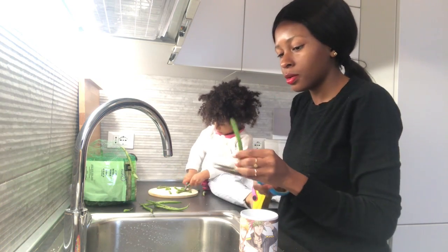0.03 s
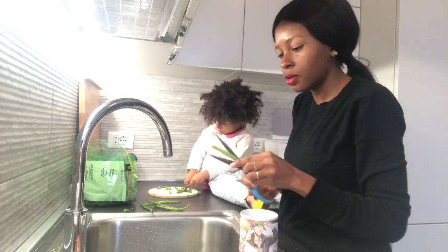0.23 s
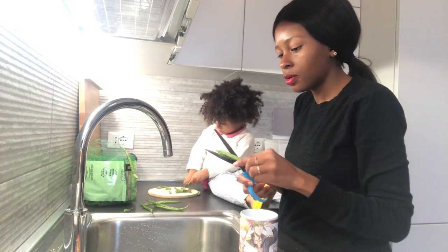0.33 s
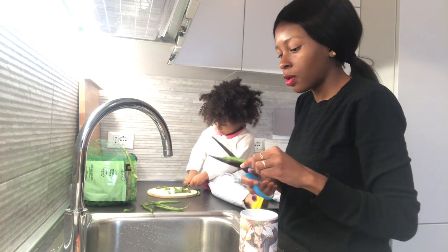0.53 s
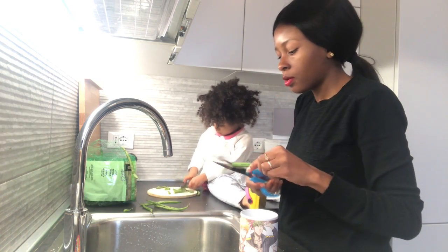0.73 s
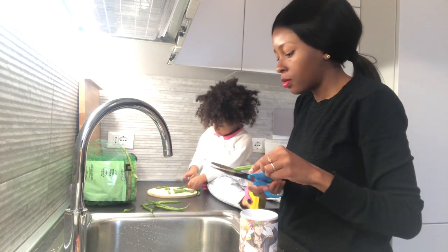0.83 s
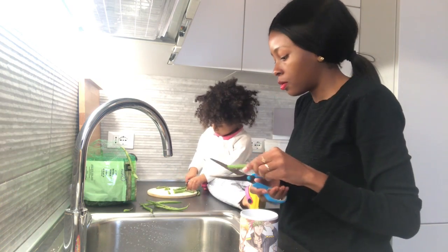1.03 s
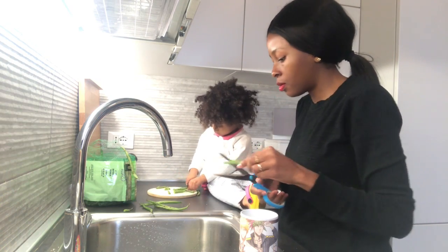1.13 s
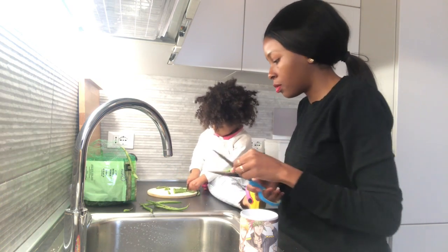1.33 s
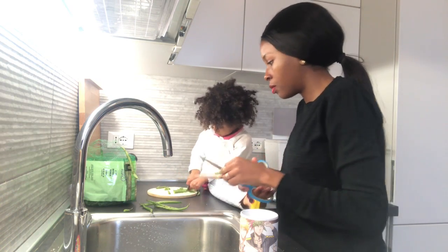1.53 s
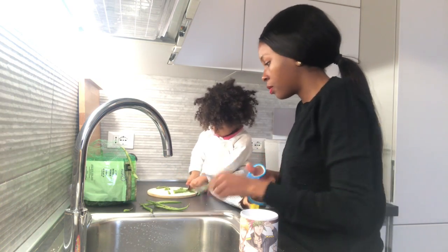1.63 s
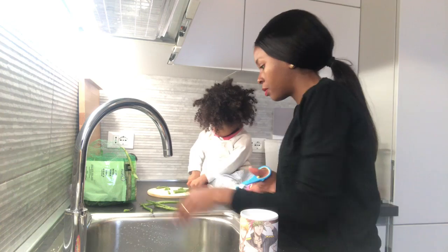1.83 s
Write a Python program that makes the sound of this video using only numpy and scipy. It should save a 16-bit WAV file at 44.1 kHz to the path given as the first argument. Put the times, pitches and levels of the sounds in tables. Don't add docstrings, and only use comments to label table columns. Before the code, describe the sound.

A blade chops through a bean onto a wooden board, which knocks, then scissors snap softly

```python
import sys
import numpy as np
from scipy import signal
from scipy.fft import rfft, irfft, next_fast_len
from scipy.io import wavfile
from scipy.ndimage import uniform_filter1d, map_coordinates

SR = 44100
rng = np.random.default_rng(int(sys.argv[2]) if len(sys.argv) > 2 else 0)


def field_ratio(decibels):
    return 10 ** (np.asarray(decibels, dtype=float) / 20)


def dump_mix(stems):
    frames = np.atleast_2d(stems).T
    limited = np.clip(frames, -1, 1)
    pcm = np.round(limited * 32767).astype(np.int16)
    wavfile.write(sys.argv[1], SR, pcm)


N = 83790


def unit(x):
    return x / np.sqrt(np.mean(x ** 2) + 1e-20)


def along(points, hz):
    point_hz, value = np.transpose(points)
    return np.interp(np.log(hz + 1), np.log(point_hz + 1), value)


def filtered(x, response):
    size = next_fast_len(len(x) + 8192)
    spectrum = rfft(x, size) * response(np.fft.rfftfreq(size, 1 / SR))
    return irfft(spectrum, size)[:len(x)]


def peak(hz, width_hz):
    return lambda f: 1j * f * width_hz / (hz * hz - f * f + 1j * f * width_hz + 1e-9)


def wobble(rate_hz, size):
    points = rng.standard_normal(int(size * rate_hz / SR) + 4)
    return map_coordinates(points, [np.arange(size) * rate_hz / SR])


def scrub(length_s):
    fade = np.exp(-np.arange(2048) / SR / length_s)
    x = fade * rng.standard_normal(2048)
    for _ in range(6):
        spectrum = rfft(x)
        x = irfft(spectrum / np.abs(spectrum))
        power = np.abs(uniform_filter1d(x * x, size=64, mode="wrap"))
        x = x * fade / np.sqrt(power + 1e-12)
    return x


MOST_CYCLES, STEEL_CYCLES = 48, 140
SPREAD_DB, WAVER = 1.5, 0.003
CRACK_DB = 14
LOW_CUT_HZ = 234


def strike(hits, modes, count=MOST_CYCLES):
    out = np.zeros(N + SR)
    t = np.arange(SR // 4) / SR
    hz, level_db, t60_s = np.transpose(modes)[:, :, None]
    t60_s = np.minimum(t60_s, count / hz)
    signs = (-1.) ** np.arange(len(modes))
    for start_s, level, bright_hz, scrub_s in hits:
        level_chance, pitch_chance = rng.standard_normal((2, len(modes), 1))
        fade = field_ratio(level_db + SPREAD_DB * level_chance - 60 * t / t60_s)
        tones = np.sin(2 * np.pi * hz * (1 + WAVER * pitch_chance) * t)
        ring = signs @ (fade * tones)
        ring[0] += field_ratio(CRACK_DB)
        x = signal.fftconvolve(scrub(scrub_s), ring)[:len(t)]
        x = filtered(x, lambda f: (1j * f / (LOW_CUT_HZ + 1j * f) / (1 + 1j * f / bright_hz)) ** 2)
        out[round(start_s * SR):][:len(t)] += field_ratio(level) * x / np.abs(x).max()
    return out[:N]


# start_s, peak level_db, brightness_hz, scrub_s
CHOPS = [
    (.1825, -44, 900, 0.0038),
    (.1908, -14, 5800, 0.003),
    (.1942, -16.5, 6500, 0.0021),
]
# pitch_hz, level_db, t60_s (time to fade by 60 dB)
BOARD = [(335.8, 0.5, 0.14), (377.6, 0.5, 0.04), (540, -7.5, 0.019), (630, 0, .08), (868, -5.5, .055),
         (931, -0.5, 0.029), (1120, -13, 0.038), (1302, -13, .04), (1623, -6.5, .04), (1943, -3, .015),
         (2400, 0, 0.0046), (3160, -3, 0.021), (3910, -4.5, .012), (4290, -4, 0.014)]


def chopping():
    return strike(CHOPS, BOARD)


# start_s, peak level_db, brightness_hz, scrub_s
ROCKS = [
    (.370, -21, 2210, 0.0042),
    (.377, -22.5, 2210, 0.0037),
    (.567, -49.5, 1500, 0.0017),
    (.7395, -48.5, 1220, 0.000967),
    (.759, -53.5, 1530, 0.013),
]
# pitch_hz, level_db, t60_s
PRESSED = [(359, 0, 0.038), (494, -5, 0.017), (631, -6, 0.047), (872, -1.5, 0.041), (1010, -3.5, 0.055),
           (1225, -2.5, 0.029), (1316, 0.5, .06), (1626, -4, 0.048), (2130, -14, 0.024),
           (2926, -10.5, 0.024), (4030, -8, 0.01)]
# start_s, peak level_db, brightness_hz, scrub_s
SETTLES = [
    (.447, -36.5, 5000, 0.0078),
    (.4545, -40, 1800, 0.0023),
    (.4585, -32, 1800, 0.0024),
    (.502, -43, 1500, .001),
]
# pitch_hz, level_db, t60_s
EDGE = [(300, -10, .03), (880, -5, .05), (965, 0, .05), (1250, -2, .038), (2000, -14, .02),
        (3200, -14, .015), (4000, -14, .012)]
# start_s, peak level_db, brightness_hz, scrub_s
NUDGES = [
    (1.286, -53, 1540, 0.0032),
    (1.315, -58, 507, 0.0012),
    (1.4035, -46.5, 690, 0.00063),
    (1.423, -48.5, 920, 0.0012),
    (1.4385, -42.5, 1530, 0.00094),
    (1.5, -57.5, 1200, 0.0084),
    (1.539, -53, 492, 0.00097),
    (1.586, -52.5, 590, 0.00086),
    (1.8235, -51.5, 795, .001),
]
# pitch_hz, level_db, t60_s
HELD = [(326, -2.5, 0.039), (396, -3, 0.027), (545, -8.5, 0.018), (648, -12, 0.072), (955, -13.5, 0.066),
        (1290, -7, 0.016), (1640, -13.5, 0.031)]


def board_moving():
    return strike(ROCKS, PRESSED) + strike(SETTLES, EDGE) + strike(NUDGES, HELD)


# start_s, peak level_db, brightness_hz, scrub_s
TIP_SNAP = [
    (.5268, -36.5, 9300, 0.0028),
    (.5298, -34, 6240, 0.0039),
    (.545, -39, 3000, 0.0057),
]
# pitch_hz, level_db, t60_s
TIPS = [(1000, -12, .026), (1600, -8, .025), (1800, -6, .03), (2200, -11, .02), (2700, -9, .03),
        (3330, -6, .035), (3850, 1, .022), (4600, -5, .02), (5800, -4, .014), (7460, -9, .0063)]
# start_s, peak level_db, brightness_hz, scrub_s
SHUT_SNAP = [
    (.9955, -49, 9000, 0.0052),
    (.998, -38.5, 9100, 0.0018),
    (1.0005, -41, 7170, 0.0026),
]
# pitch_hz, level_db, t60_s
HANDLES = [(1034, -22, .03), (1225, -4, .11), (1330, -9, .03), (1850, -11, .02), (3310, 1, .035),
           (3700, -4, .015), (4400, -6, .012), (5800, -7, .01), (7500, -9, .008)]
# start_s, peak level_db, brightness_hz, scrub_s
PINCH = [
    (.8065, -41, 5040, 0.003),
]
# pitch_hz, level_db, t60_s
PIVOT = [(1803, 2.5, 0.02), (2120, 2, .02), (4200, -5, 0.01), (5850, -2, 0.0083)]


def scissors():
    snaps = strike(TIP_SNAP, TIPS, count=STEEL_CYCLES) + strike(SHUT_SNAP, HANDLES, count=STEEL_CYCLES)
    return snaps + strike(PINCH, PIVOT)


# start_s, rise_s, fall t60_s, level_db, colour_hz
CRUNCH = [(.001, 0.0033, 0.18, -61, 5600), (0.19, .0005, 0.021, -78, 13500),
          (0.193, 0.00027, 0.05, -33, 2870), (.303, .002, 0.13, -56.5, 7000),
          (0.327, 0.0036, 0.072, -57, 11000), (0.352, .01, 0.29, -59, 9000),
          (0.375, 0.0098, 0.039, -46, 10800), (0.391, 0.036, 0.092, -52, 7660),
          (0.45, 0.006, 0.056, -49.5, 3000), (0.456, 0.0023, 0.031, -74, 11200),
          (0.527, 0.0003, 0.13, -47, 2970), (0.7679, 0.00011, 0.012, -41, 8100),
          (0.771, 0.0017, 0.052, -51.5, 6000), (0.81, 0.015, 0.087, -43.5, 8600),
          (.825, 0.013, 0.017, -59, 1000), (1.03, 0.0073, 0.49, -72, 1240),
          (1.721, 0.058, 0.8, -70.5, 6000), (.998, 0.0015, 0.029, -46.5, 6030),
          (1.021, 0.0035, 0.071, -59, 10100), (1.184, 0.0039, 0.055, -60, 7300),
          (1.3, 0.0069, 0.92, -76, 2180), (1.425, 0.054, 0.14, -61, 7040),
          (1.443, 0.012, 0.061, -50.5, 8040), (1.5, 0.0098, 0.16, -87, 4940)]
CRUNCH_WIDTH = 1.6
GRIT_DB = 2.2


def crunch(bursts):
    lead, size = SR // 10, SR // 2
    out = np.zeros(N + size)
    t = (np.arange(size) - lead) / SR
    for start_s, rise_s, fall_s, level_db, colour_hz in bursts:
        colour = peak(colour_hz, CRUNCH_WIDTH * colour_hz)
        rough = rng.standard_normal(size) * field_ratio(GRIT_DB * wobble(990, size))
        grit = unit(filtered(rough, lambda f: colour(f) ** 2))
        rise = np.exp(np.minimum(t, 0) / rise_s)
        shape = np.where(t < 0, rise, field_ratio(-60 * np.abs(t) / fall_s))
        out[round(start_s * SR):][:size] += field_ratio(level_db) * grit * shape
    return out[lead:N + lead]


# middle_s, half_length_s, level_db, pitch_hz
SLIDES = [
    (0.776, 0.014, -56, 3200),
    (1.063, 0.023, -71, 3300),
    (1.1, 0.095, -66, 1380),
    (1.195, 0.019, -68.5, 4040),
    (1.296, 0.016, -69, 2080),
    (1.406, 0.046, -70, 2240),
    (1.452, 0.025, -63.5, 864),
]
SLIDE_WIDTH = 0.12


def slides():
    t = np.arange(N) / SR
    out = np.zeros(N)
    for middle_s, half_s, level_db, hz in SLIDES:
        swell = np.exp(-((t - middle_s) / half_s) ** 2)
        noise = filtered(rng.standard_normal(N), peak(hz, SLIDE_WIDTH * hz))
        out += field_ratio(level_db) * swell * unit(noise)
    return out


# start_s, peak level_db, pitch_hz, t60_s
THUDS = [
    (.196, -43, 143.6, 0.26),
    (0.373, -39, 79, 0.051),
    (0.384, -53, 161, 0.49),
    (0.69, -57, 176, 0.24),
    (1.009, -40.5, 196, 0.1),
    (1.042, -47, 202, .1),
    (1.078, -47.5, 191, 0.1),
    (1.303, -59, 136.4, 0.37),
    (1.412, -58, 142.3, 0.49),
]
THUD_RISE_S, BOOM_FLUTTER_DB = 0.0063, 2.2
# start_s, level_db, pitch_hz, t60_s
RING_TICK = (1.596, -56, 13800, .04)


def counter():
    t = np.arange(N) / SR
    start_s, level_db, hz, t60_s = np.transpose(THUDS)[:, :, None]
    since = np.maximum(t - start_s, 0)
    shape = field_ratio(level_db - 60 * since / t60_s) * (1 - np.exp(-since / THUD_RISE_S))
    booms = shape * np.sin(2 * np.pi * hz * since)
    booms = (booms * field_ratio(BOOM_FLUTTER_DB * wobble(44.78, N))).sum(0)

    tick_s, tick_db, tick_hz, tick_t60_s = RING_TICK
    tick = unit(filtered(rng.standard_normal(N), lambda f: peak(tick_hz, 2500)(f) ** 2))
    fade = (t > tick_s) * field_ratio(-60 * np.abs(t - tick_s) / tick_t60_s)
    return booms + field_ratio(tick_db) * tick * fade


# start_s, rise_s, fall t60_s, level_db, colour_hz
WASH = [
    (.197, 0.0014, 0.37, -42, 2100),
    (.2, 0.0026, 0.39, -40.5, 520),
    (.378, 0.0061, 0.18, -46.5, 2400),
    (.465, 0.0049, 0.23, -51.5, 1480),
    (.5272, 0.00026, 0.017, -40, 4500),
    (.57, 0.024, 0.17, -57.5, 260),
    (.3, 0.024, 0.35, -54, 230),
    (1.04, 0.036, 0.39, -62.5, 340),
]


def wash():
    return crunch(WASH)


# pitch_hz, t60_s
KITCHEN = [(150, .6), (1000, .5), (4000, .45), (8000, .3), (13000, .16)]
WET_DB = -7
NEAR_DB, NEAR_SHARE = 7, 0.23


def kitchen(x):
    hz, t, noise = signal.stft(rng.standard_normal(SR * 3 // 4), SR, nperseg=256)
    fall_db = -60 * t / along(KITCHEN, hz)[:, None]
    fade = field_ratio(fall_db) + field_ratio(NEAR_DB + fall_db / NEAR_SHARE)
    tail = signal.istft(noise * fade, SR, nperseg=256)[1]
    late = np.pad(x, (90, 0))
    return signal.fftconvolve(late, tail / np.linalg.norm(tail))[:N]


# pitch_hz, level_db
AIR = [(38, -29), (60, 4), (150, 4), (400, -4), (1200, -5.5), (4000, -14), (8000, -21), (16000, -25.5)]
AIR_DB, PATCHY_DB = -61, 1.6
# time_s, lift_db
STIR = [(0, 5), (0.101, -2.3), (.65, 0), (.9, -2.5), (1.1, -2), (1.3, -1.5), (1.499, -0.5), (1.679, -4),
        (1.9, -2)]
# pitch_hz, width_hz, level_db
HUM = [
    (49.4, 6.2, -69),
    (98.2, 5.2, -73),
    (155, 8, -82.5),
    (8520, 680, -71.5),
]


def room_tone():
    noise = signal.stft(rng.standard_normal(N + 512), nperseg=512)[2]
    patches = uniform_filter1d(rng.standard_normal(noise.shape), 6, 0)
    patches = unit(uniform_filter1d(patches, 10, 1))
    air = signal.istft(noise * field_ratio(PATCHY_DB * patches), nperseg=512)[1][:N]
    air = unit(filtered(air, lambda f: field_ratio(along(AIR, f) - along(MIC, f)) * (f > 38)))
    lift_db = np.interp(np.arange(N) / SR, *np.transpose(STIR))

    hum = np.zeros(N)
    for hz, width_hz, level_db in HUM:
        line = filtered(rng.standard_normal(N), peak(hz, width_hz))
        hum += field_ratio(level_db) * unit(filtered(line, peak(hz, width_hz)))
    return field_ratio(AIR_DB + lift_db) * air + hum


def scene():
    out = counter() + room_tone() + slides() + wash()
    for source in [chopping(), board_moving(), scissors(), crunch(CRUNCH)]:
        out += source + field_ratio(WET_DB) * kitchen(source)
    return out[None]


# pitch_hz, level_db
MIC = [(60, -0.5), (300, 3.23), (6500, 0), (9800, -13.5), (12000, -5), (15500, -3)]
TOP_HZ = 15900


def microphone(x):
    return filtered(x, lambda f: field_ratio(along(MIC, f)) * (f < TOP_HZ))


def band_limit(x):
    return signal.sosfilt(signal.butter(12, 16500, fs=SR, output="sos"), x)


def record(dry):
    mix = microphone(dry[0])[None]
    return band_limit(mix)


dry = scene()
out = record(dry)
dump_mix(out)
```